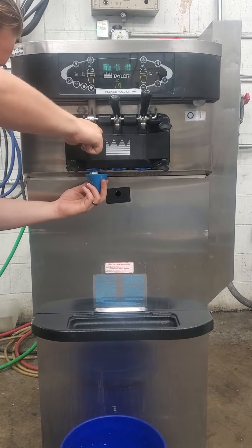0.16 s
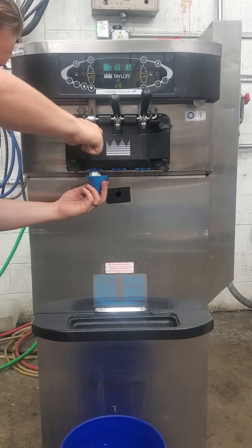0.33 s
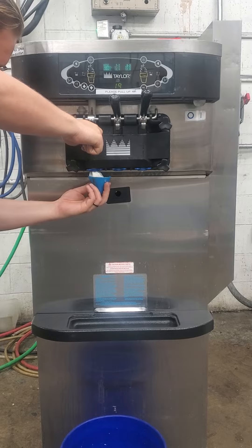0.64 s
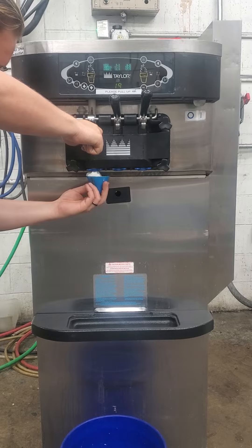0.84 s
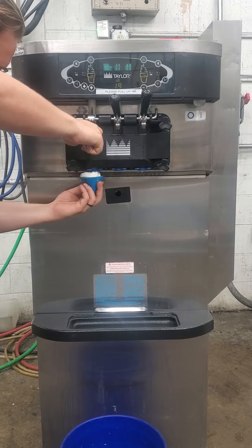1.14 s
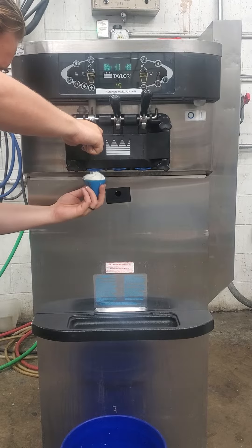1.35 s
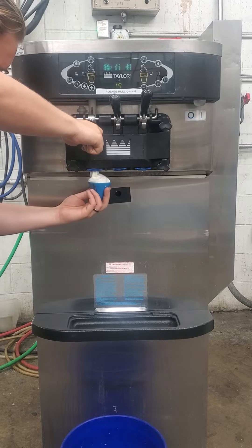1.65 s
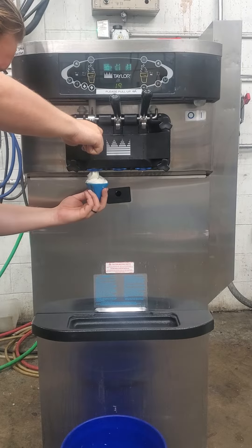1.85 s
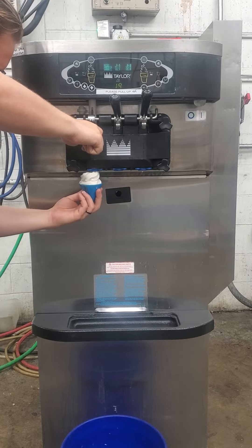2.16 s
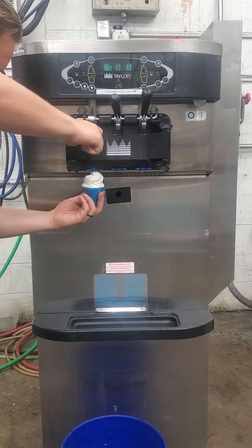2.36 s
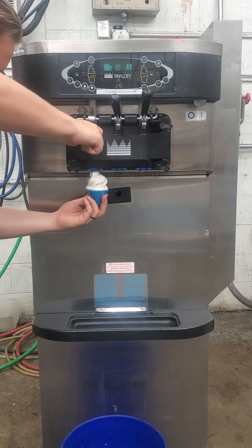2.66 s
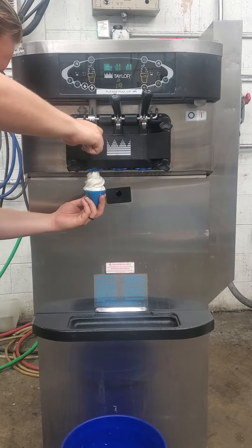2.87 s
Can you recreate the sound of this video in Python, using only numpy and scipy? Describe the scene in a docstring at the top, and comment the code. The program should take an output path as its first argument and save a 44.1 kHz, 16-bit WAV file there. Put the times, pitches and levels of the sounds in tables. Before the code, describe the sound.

A soft-serve machine hums steadily in a hard-walled workshop, with a motor whine, rushing fan air and lightly buzzing steel panels. Halfway through, air pockets snap and sputter at the nozzle as a cup fills.

```python
"""A steady hum and drone fill a hard-walled workshop: a soft-serve machine is filling a cup.
Mains hum beats against the fan's blade tones, the drive motor whines, and air rushes through the
cabinet, heaving as the beater churns. Forced vibration makes the steel panels buzz, sing and rattle,
with soft knocks now and then. Half-way through, air pockets in the cream burst at the nozzle,
snapping and crackling, and the walls reverberate."""
import sys
import numpy as np
from scipy import signal
from scipy.fft import rfft, irfft
from scipy.io import wavfile

SR = 44100
rng = np.random.default_rng(int(sys.argv[2]) if len(sys.argv) > 2 else 0)


def unload_audio(sound):
    """Save the sound as a 16-bit wav file, at the path given as the first command line argument."""
    columns = np.transpose(np.atleast_2d(sound))
    # keep every value between -1 and 1, then stretch to whole-number steps
    steps = np.round(np.clip(columns, -1, 1) * 32767)
    wavfile.write(sys.argv[1], SR, steps.astype(np.int16))


N = 132300
T = np.arange(N) / SR
HZ = np.maximum(np.arange(N // 2 + 1) * SR / N, 1)

MAINS_HZ, FAN_HZ, SHAFT_HZ = 60.02, 72.3, 30.012
BEATER_HZ, BEATER_PEAK_S = 4.2, .185


def from_db(db):
    """Amplitude ratio: a factor of ten for every 20 dB."""
    return 10 ** (np.asarray(db) / 20)


def rms_one(x):
    """Normalisation to unit mean power."""
    return x / np.sqrt(np.mean(x ** 2) + 1e-20)


def curve(points):
    """Interpolation of (f/Hz, value) points along a logarithmic frequency axis."""
    hz, value = np.transpose(points)
    return np.interp(np.log(HZ), np.log(hz), value)


def colour(x, spectrum):
    """Spectral shaping: white sound of unit power takes on a spectrum level (dB in a 1 Hz band)."""
    return irfft(rfft(x) * from_db(curve(spectrum)) * np.sqrt(SR / 2), N)


def drift(rate_hz):
    """Low-pass noise: a random wander of unit spread."""
    return rms_one(irfft(rfft(rng.standard_normal(N)) * (HZ > 1) / (1 + (HZ / rate_hz) ** 2) ** 2, N))


def pan(db):
    """Interchannel level difference: gains for left minus right in dB."""
    return from_db(np.array([[.5], [-.5]]) * db)


def tones(rows, waver_db, waver_rad, waver_hz, scatter=1):
    """Superposed partials wavering in level and phase; without scatter they pulse in step."""
    out = np.zeros((2, N))
    for hz, db, pan_db, lead in rows:
        phase = 2 * np.pi * (hz * T + scatter * rng.random()) + waver_rad * drift(waver_hz)
        amplitude = np.sqrt(2) * from_db(db + waver_db * drift(waver_hz))
        out += amplitude * pan(pan_db) * np.sin(phase + np.array([[.5], [-.5]]) * lead)
    return out


def harmonics(rows, base_hz):
    """Harmonic series: each order becomes that multiple of the fundamental."""
    return [(round(k) * base_hz, *rest) for k, *rest in rows]


def mains_hum():
    """Vibration forced by the mains sounds at even harmonics of the supply frequency."""
    # hum partials: order, level/dB, left minus right/dB, left phase lead/rad
    partials = [(2, -32.5, -0.5, -0.037), (4, -56.5, -6, 0.067), (6, -47.5, -2, 0.0064), (8, -56, 5, -.4)]
    return tones(harmonics(partials, MAINS_HZ), waver_db=.8, waver_rad=0.094, waver_hz=4.5)


def fan_drone():
    """The periodic passage of the blades radiates a harmonic series."""
    # blade tones: order, level/dB, left minus right/dB, left phase lead/rad
    partials = [(1, -32, -1, -0.11), (2, -45.5, -1, -0.13), (3, -52, 10, 0.38), (4, -51, 3, -0.075),
                (6, -51, -2, -0.49), (7, -55, -7.5, -.3)]
    return tones(harmonics(partials, FAN_HZ), waver_db=.5, waver_rad=0.25, waver_hz=1.6)


def cabinet_tones():
    """The vibrating cabinet radiates low inharmonic partials."""
    # cabinet tones: f/Hz, level/dB, left minus right/dB, left phase lead/rad
    partials = [(41.4, -58, 0, .1), (63.65, -44.5, -0.5, -0.11), (87, -48, -5.5, 0.068),
                (96.5, -45.5, 8, -0.1), (149.3, -49.5, 5, -.2)]
    return tones(partials, waver_db=0.7, waver_rad=0.39, waver_hz=3.8)


def motor_whine():
    """Phase-locked partials beat at twice the mains rate; the shaft's other sidebands run loose."""
    # slot tone and sidebands: shaft order, level/dB, left minus right/dB, left phase lead/rad
    partials = [(39, -63, -11, -3.5), (40, -50.5, 13.5, 3), (43, -49, -8, -2.5), (44, -36.5, -5, -1.65),
                (45, -48, -1, -2.3), (46, -52, 11, 2.4), (48, -44.5, 6.5, 0), (49, -53.5, 1, 0.2),
                (50, -59, 11, -3), (52, -53, -13, -2.2), (53, -59.5, 15, -1.5)]
    locked = [row for row in partials if round(row[0]) % 4 == 0]
    loose = [row for row in partials if row not in locked]
    return (tones(harmonics(locked, SHAFT_HZ), waver_db=0.97, waver_rad=0.076, waver_hz=4, scatter=0)
            + tones(harmonics(loose, SHAFT_HZ), waver_db=3.6, waver_rad=0.35, waver_hz=2.3))


def room_noise():
    """Spatial coherence: white noise, alike on both sides in the bass and diffuse in the treble."""
    # likeness of left and right: f/Hz, correlation (-1 to 1)
    coherence = [(60, 0.82), (110, 0.96), (200, 0.96), (380, 0.83), (700, 0.38), (1290, -0.21),
                 (2400, -0.1), (15000, -0.024)]
    alike = np.clip(curve(coherence), -.999, .999)
    mid, side = rfft(rng.standard_normal((2, N)))
    return irfft(np.sqrt((1 + alike) / 2) * mid + np.sqrt((1 - alike) / 2) * side * [[1], [-1]], N)


def rushing_air():
    """Broadband flow noise of fan air passing through the cabinet."""
    # flow noise: f/Hz, spectrum level/dB
    spectrum = [(22, -81), (35, -74), (50, -59), (68, -66), (105, -60.5), (180, -63), (215, -64.5),
                (275, -66), (335, -64), (378, -60), (425, -65.5), (500, -67.5), (700, -68), (1080, -73),
                (1330, -69), (1800, -73.5), (2650, -76), (4200, -82), (6500, -85.5), (9500, -91),
                (13000, -87.5), (16000, -91.5)]
    return colour(room_noise(), spectrum) * pan(db=0.6)


def beater(order):
    """Periodic loading by the beater in the cream: a unit cosine, `order` cycles a turn."""
    return np.cos(2 * np.pi * order * BEATER_HZ * (T - BEATER_PEAK_S))


def churn(x, wander_db=1.27, wander_hz=7.2, blade_db=1.0):
    """Amplitude modulation: octave bands wander; the low middle heaves as two beater blades pass."""
    out, together, spectrum = 0, drift(wander_hz), rfft(x)
    for octave in range(4, 15):
        band = irfft(spectrum * np.clip(1 - np.abs(np.log2(HZ) - octave), 0, 1), N)
        depth_db = wander_db if 2 ** octave < 2000 else wander_db / 2
        heave_db = blade_db * beater(order=2) if 200 < 2 ** octave < 700 else 0
        out = out + band * from_db(heave_db + depth_db * (.5 * together + drift(wander_hz)))
    return out


def panel_buzz(flutter_db=4, flutter_hz=48, beater_db=0.54):
    """Periodic forcing: a rattle repeated each turn gives a comb of lines, fluttering band by band."""
    # steel panel buzz: f/Hz, spectrum level/dB
    spectrum = [(700, -79), (1800, -79), (2650, -75.5), (3500, -76), (4200, -82.5), (4900, -86),
                (6500, -86.5), (10000, -89.5), (15000, -102)]
    # slow swell of the buzz: t/s, relative level/dB
    swell = [(0, -1), (.45, -1.5), (1.8, -0.5), (2.3, 1), (2.6, -1.5), (3, -1.5)]
    shaking = np.zeros((2, N))
    for turn_hz in (29.3, 57.8, 24.1):  # turning rates of the drive and the compressor
        turn = rng.standard_normal((2, int(SR / turn_hz)))
        shaking += turn[:, np.arange(N) % turn.shape[1]]
    comb, buzz = rfft(shaking), 0
    for third_octave in range(24, 43):
        band = irfft(comb * np.clip(1 - np.abs(3 * np.log2(HZ) - third_octave), 0, 1), N)
        buzz = buzz + band * from_db(flutter_db * drift(flutter_hz))
    level_db = np.interp(T, *np.transpose(swell)) + beater_db * beater(order=1)
    return colour(rms_one(buzz), spectrum) * from_db(level_db)


def panel_singing(roughness=0.7, waver_hz=21):
    """Resonance: panel modes sing, their amplitude and phase wandering independently on each side."""
    # panel resonances: f/Hz, level/dB
    modes = [(2401, -58), (2641, -55), (2761, -53.5), (3121, -76), (3359, -59), (3452, -60), (3621, -58),
             (4820, -62)]
    out = np.zeros((2, N))
    for hz, db in modes:
        for side in out:
            steady = np.exp(2j * np.pi * rng.random())
            phasor = steady + roughness * (drift(waver_hz) + 1j * drift(waver_hz))
            side += from_db(db) * rms_one(np.real(phasor * np.exp(2j * np.pi * hz * T)))
    return out


def sheet_rattle(taps_per_s=460, level_db=-48.5, t60_s=0.053):
    """Impact excitation: random taps ring the damped modes of loose sheet metal, high ones fainter."""
    modes_hz = np.geomspace(2270, 5220, 40)
    radius, out = from_db(-60 / (t60_s * SR)), 0
    for hz in modes_hz:
        taps = (rng.random(N) < taps_per_s / len(modes_hz) / SR) * rng.standard_normal((2, N))
        angle = 2 * np.pi * hz / SR
        poles = [1, -2 * radius * np.cos(angle), radius * radius]
        out = out + signal.lfilter([0, np.sin(angle)], poles, taps + 1e-18) / hz
    return from_db(level_db) * rms_one(out)


def knocks_and_cracks(attack_s=0.0029, spread_octaves=0.63):
    """Damped transients: soft cabinet knocks, and the sharp crack and clack of bursting air pockets."""
    # cabinet knocks, and nozzle bursts at 2.319 and 2.325 s: t/s, level/dB, centre f/Hz, decay time/s
    transients = [(0.169, -37, 348, 0.024), (.885, -37.5, 523, 0.066), (1.245, -42, 600, 0.023),
                  (1.255, -34.5, 2640, .02), (1.45, -37, 450, 0.037), (1.835, -40, 427, 0.076),
                  (2.06, -35, 406, .06), (2.06, -36, 2400, 0.08), (2.319, -30, 5550, .004),
                  (2.325, -31, 2470, 0.013), (2.39, -34.5, 380, 0.032), (2.645, -35, 546, 0.031)]
    out = 0
    for onset, db, hz, decay in transients:
        band = np.exp(-.5 * (np.log2(HZ / hz) / spread_octaves) ** 2)
        body = rms_one(irfft(rfft(room_noise()) * band, N))
        age = np.maximum(T - onset, 0)
        out = out + from_db(db) * np.minimum(age / attack_s, 1) * np.exp(-age / decay) * body
    return out


def snaps(decay_s=0.00076, bandwidth_hz=3600, puff_db=-15):
    """Cavity resonance: each air pocket bursts in a short, bright puff that rings in its hollow."""
    # air pockets bursting at the nozzle: t/s, level/dB, resonance f/Hz
    pockets = [(1.53, -32, 10200), (1.6705, -34, 13000), (1.679, -28, 14500), (1.782, -28, 12500),
               (1.839, -29, 13100), (1.8665, -28, 12800), (2.064, -31, 11300), (2.1068, -22, 13800),
               (2.186, -33, 14100), (2.289, -38, 12500), (2.308, -30, 12500), (2.3204, -29, 11600),
               (2.325, -32, 12300), (2.331, -29, 14000)]
    out = np.zeros((2, N))
    radius = np.exp(-np.pi * bandwidth_hz / SR)
    age = T[:SR // 20]
    for onset, db, hz in pockets:
        puff = rng.standard_normal((2, len(age)))
        cavity = [1, 0, -1, 1, -2 * radius * np.cos(2 * np.pi * hz / SR), radius * radius]
        ring = rms_one(signal.sosfilt([cavity, cavity], puff))
        envelope = from_db(db) * np.exp(-age / decay_s)
        start = int(onset * SR)
        out[:, start:start + len(age)] += envelope * (ring + from_db(puff_db) * puff)
    return out


def sputter(attack_s=0.0034, release_s=.025, bubbles_per_s=7100):
    """Shot noise: spells of tiny bubbles burst at random as the cream is pressed out."""
    # spells of sputtering: t/s, duration/s, level/dB
    spells = [(1.658, 0.032, -42), (1.837, 0.072, -45), (2.055, 0.06, -41.5), (2.173, .025, -43),
              (2.315, 0.019, -39.5)]
    # spectrum of the bursts: f/Hz, relative level/dB
    spectrum = [(800, -8), (2500, -6), (6000, 6), (9000, -1), (13000, -3), (16000, 1.5)]
    envelope = 0
    for onset, length, db in spells:
        rise = np.clip((T - onset) / attack_s, 0, 1)
        fall = np.exp(-np.maximum(T - onset - length, 0) / release_s)
        envelope = envelope + from_db(db) * rise * fall
    bursts = (rng.random(N) < bubbles_per_s / SR) * rng.standard_normal((2, N))
    return envelope * rms_one(colour(bursts, spectrum))


def workshop(x, tail_db=-7, t60_s=0.63):
    """Reverberation: the hard walls add a diffuse tail, different on each side."""
    tail = rng.standard_normal((2, SR)) * from_db(-60 * T[:SR] / t60_s)
    tail /= np.sqrt(np.sum(tail ** 2, axis=1, keepdims=True))
    return x + from_db(tail_db) * signal.fftconvolve(x, tail, axes=1)[:, :N]


def scene():
    """Superposition of the running machine and its nozzle, which lies a little to the left."""
    drone = mains_hum() + fan_drone() + cabinet_tones() + motor_whine()
    air = churn(rushing_air())
    metal = panel_buzz() + panel_singing() + sheet_rattle()
    return drone + air + metal + knocks_and_cracks() + pan(db=2.5) * workshop(snaps() + sputter())


def record(dry):
    """Frequency response of the microphone: a dip in the treble and a steep cut at the top."""
    dip_hz, dip_width_hz, dip_db, cutoff_hz = 7860, 1010, -9.5, 15950
    dip = from_db(dip_db * np.exp(-((HZ - dip_hz) / dip_width_hz) ** 2))
    low_pass = 1 / np.sqrt(1 + (HZ / cutoff_hz) ** 500)
    return irfft(rfft(dry) * dip * low_pass, N)


dry = scene()
out = record(dry)
unload_audio(out)
```